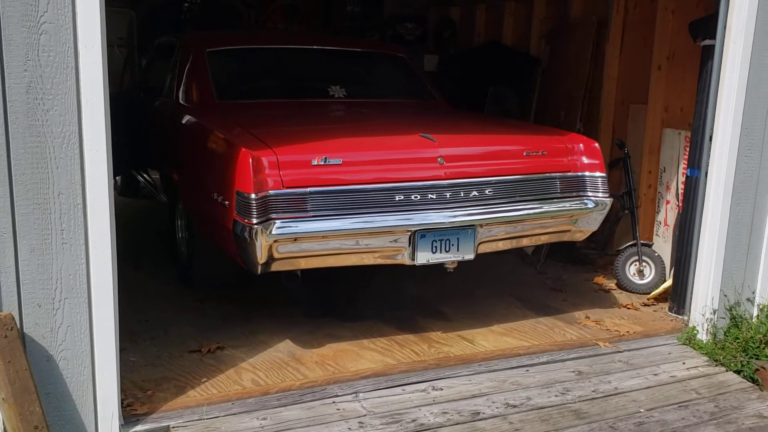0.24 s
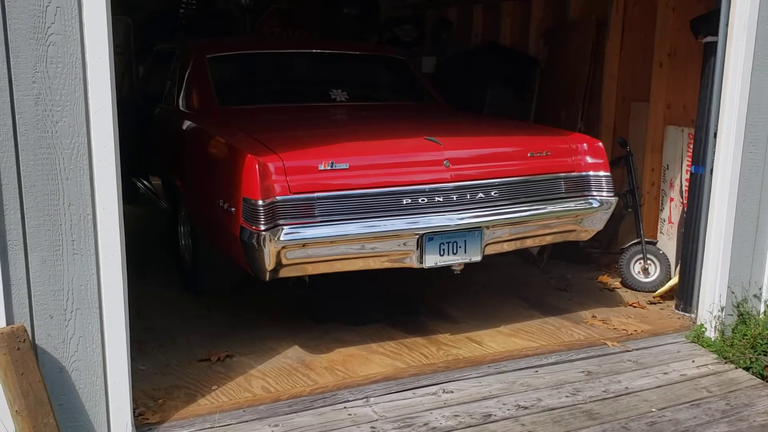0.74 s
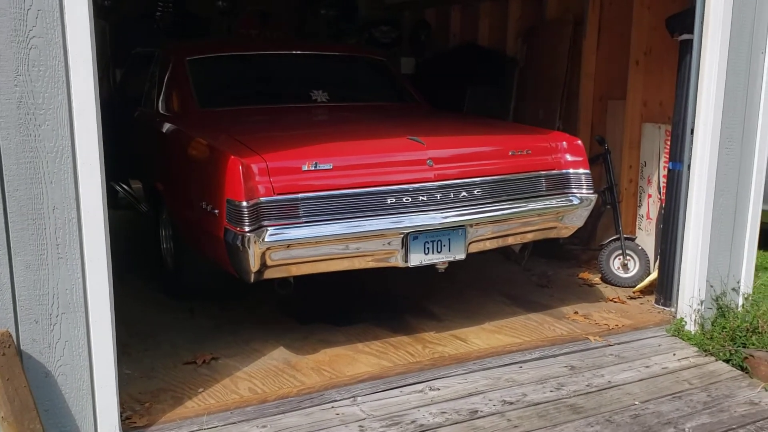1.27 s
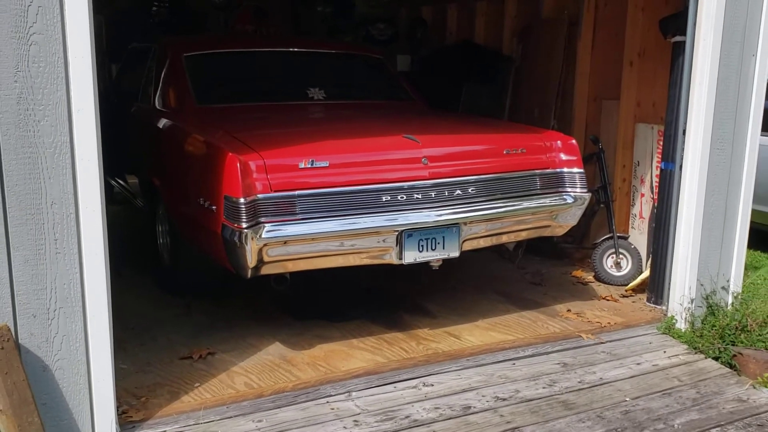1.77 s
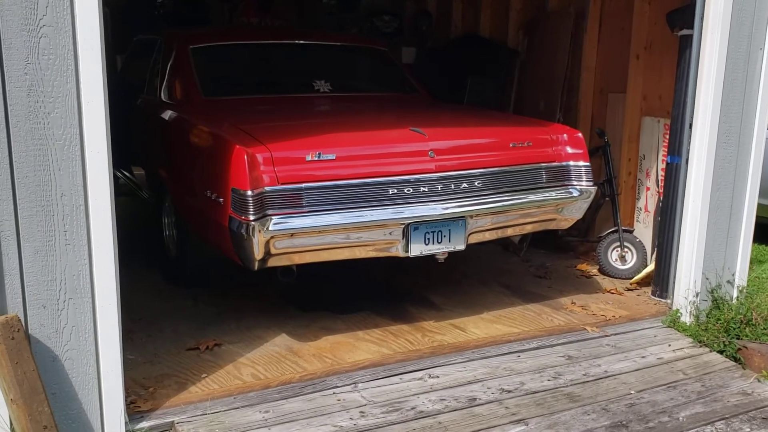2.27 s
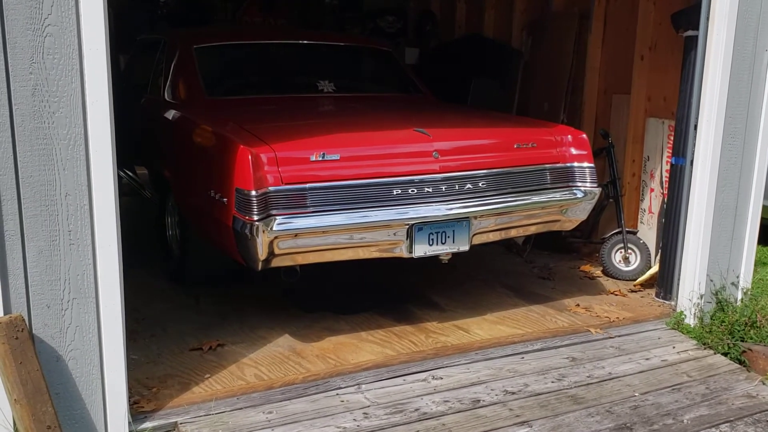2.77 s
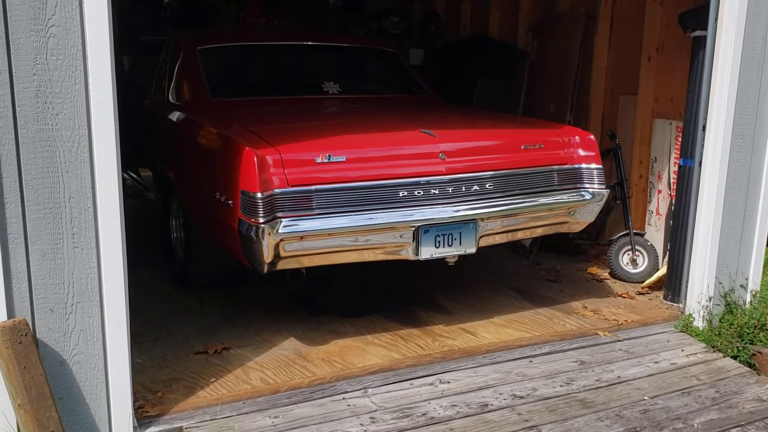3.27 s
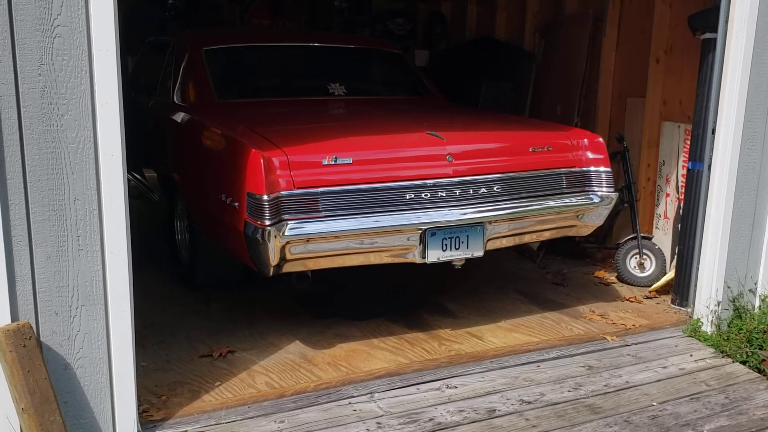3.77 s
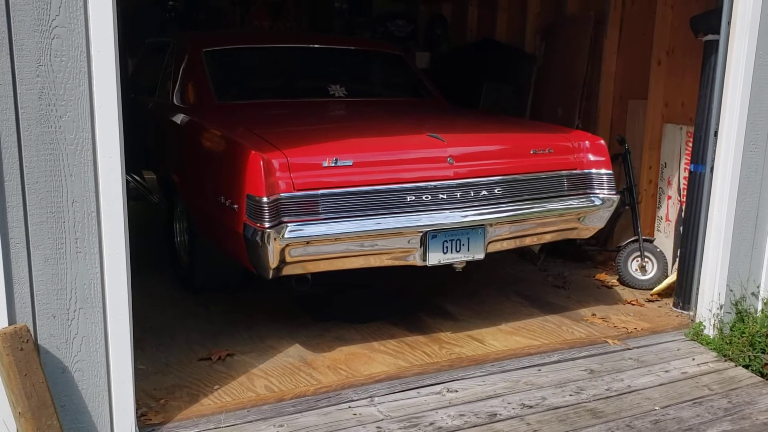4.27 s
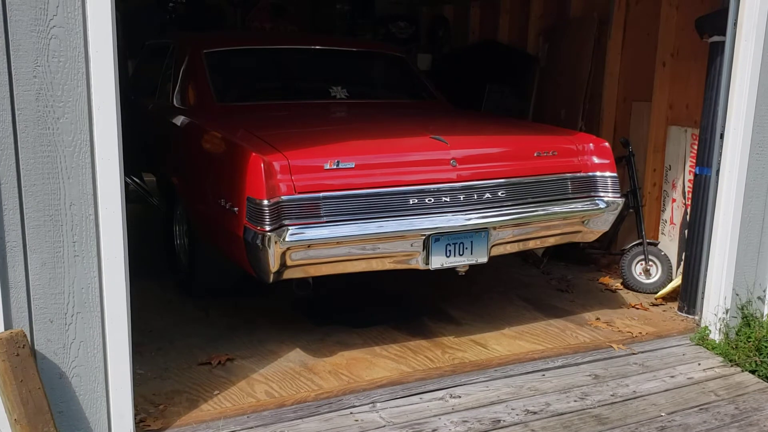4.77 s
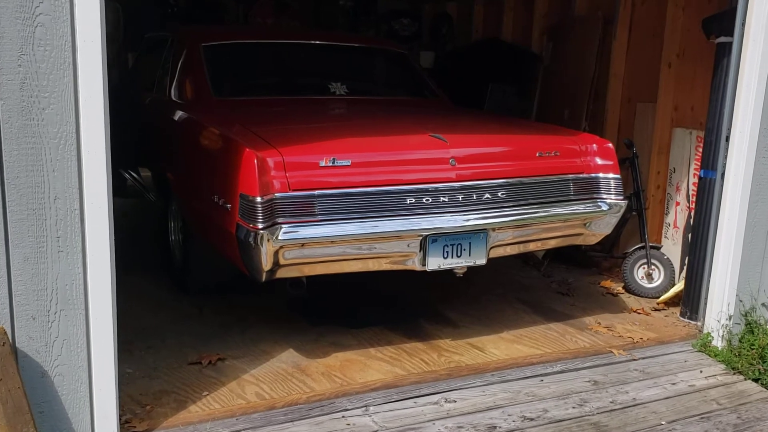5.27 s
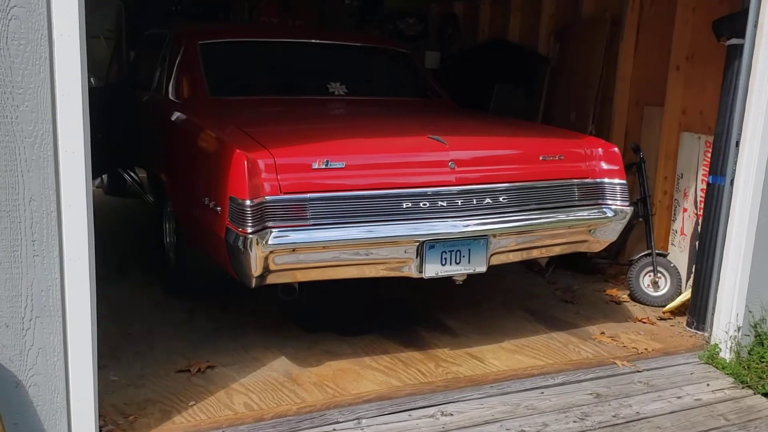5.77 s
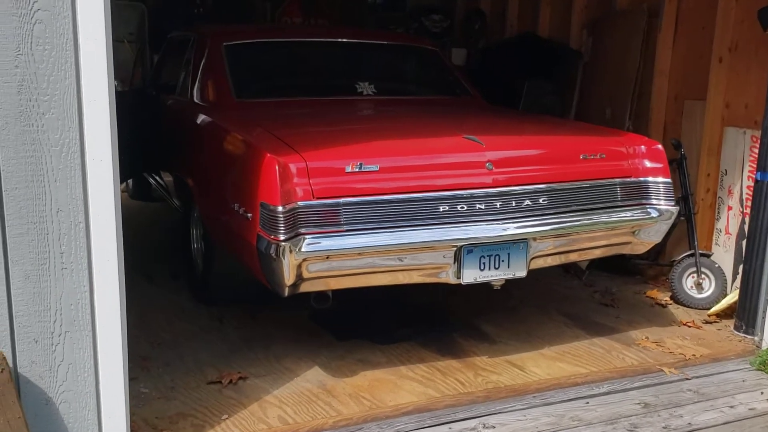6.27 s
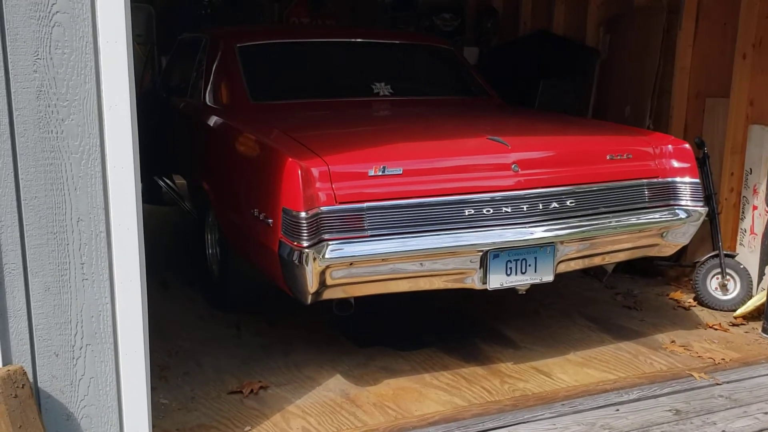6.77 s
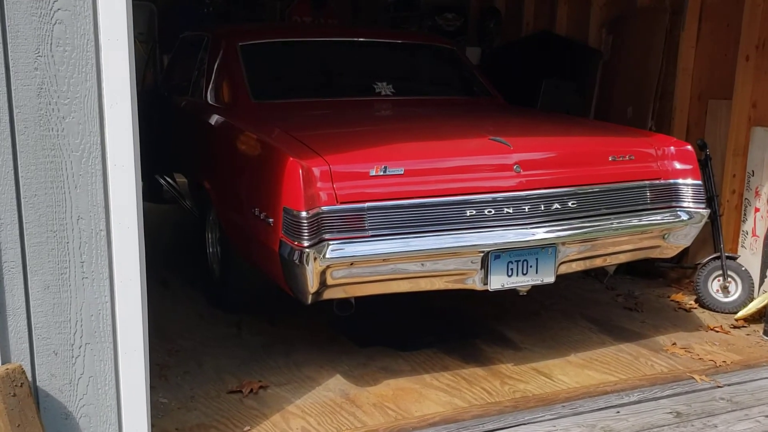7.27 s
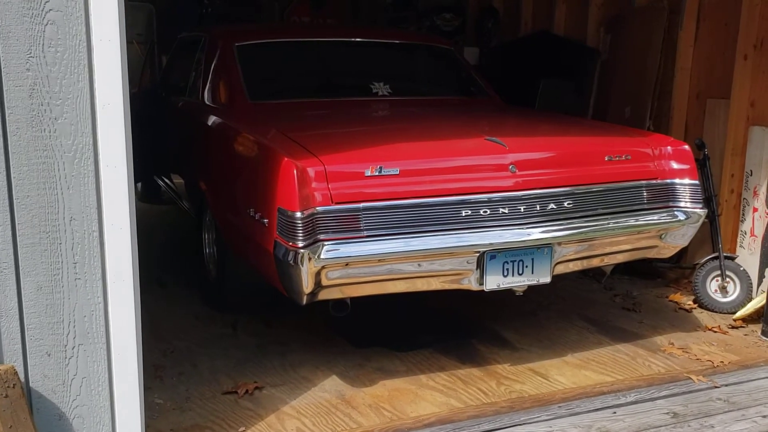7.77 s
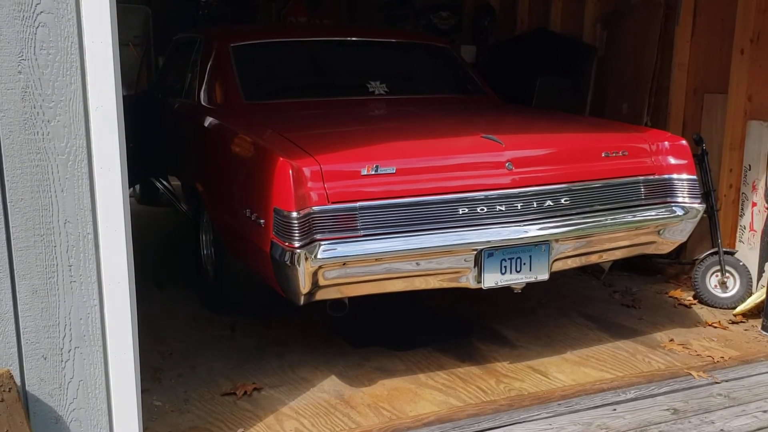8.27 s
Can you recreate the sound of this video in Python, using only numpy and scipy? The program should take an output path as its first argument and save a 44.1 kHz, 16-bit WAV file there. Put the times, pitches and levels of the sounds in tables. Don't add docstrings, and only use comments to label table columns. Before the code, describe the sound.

A large eight-cylinder engine idles inside a small wooden garage, heard close from the open door behind its twin tailpipes. It stumbles and picks up with a thin metallic rattle, a throttle blip makes it race at two seconds, then it sags, lopes and almost stalls before catching and settling into a deep hum with rhythmic exhaust chuffs. Stereo, leaning left, with short boomy wooden reflections.

```python
import sys
import numpy as np
from scipy import signal
from scipy.fft import rfft, irfft, next_fast_len
from scipy.io import wavfile
from scipy.ndimage import uniform_filter1d

SR = 44100
rng = np.random.default_rng(int(sys.argv[2]) if len(sys.argv) > 2 else 0)


def makeup_ratio(level_db):
    decades = np.asarray(level_db, float) / 20
    return 10 ** decades


def int16_out(signal):
    q = np.round(np.clip(np.atleast_2d(signal).T, -1, 1) * 32767)
    wavfile.write(sys.argv[1], SR, q.astype(np.int16))


N = 376173

# time_s, speed_cycles_per_s
ENGINE_SPEED = [(0.0, 12.399), (0.169, 12.38), (0.818, 11.053), (1.068, 11.535), (1.426, 14.023),
                (1.676, 13.357), (1.971, 17.475), (2.113, 14.799), (2.315, 13.867), (2.621, 11.376),
                (2.934, 13.166), (3.382, 12.003), (4.432, 10.099), (5.35, 11.634), (5.563, 11.947),
                (7.12, 12.996), (7.631, 11.967), (8.53, 11.038)]
# time_s, load_db
BURN_LOAD = [(0, -12.5), (.4, -8.5), (.6, -6.5), (1.0, 2.5), (1.4, -2), (1.53, -5), (1.7, -1.5),
             (1.9, -1.5), (2.0, -16), (2.15, -10.5), (2.4, -5), (2.57, -6.5), (2.7, 0), (3.2, -3.5),
             (3.8, -2.5), (4.6, -1.5), (5.1, 0), (8.53, 0.5)]


def crankshaft():
    rate, load_db = curve(ENGINE_SPEED), curve(BURN_LOAD)
    cycle = 0.157 + np.cumsum(rate) / SR
    slot = np.floor(8 * cycle - 0.2).astype(int)
    fired = np.flatnonzero(np.diff(slot)) + 1
    return rate, load_db, cycle, fired, slot[fired] % 8


# pitch_hz, level_db
FIRING_TONE = [(82, -17), (92, -15.5), (105, -15), (115, -14.5), (125, -24), (137, -21)]
# pitch_hz, level_db
BANK_TONE = [(51, -34), (56, -24.5), (60, -24), (65, -23), (72, -17), (86, -15.5)]
# pitch_hz, level_db
PAIR_TONE = [(102, -25), (112, -33), (118, -44), (126, -24), (138, -30), (160, -15), (172, -22)]
# beats_per_cycle, level_db (against the firing tone at idle)
WEAK_TONES = [(6, -43), (7, -14), (11, -48), (12, -46), (13, -33), (15, -26), (16, -19), (18, -18),
              (19, -13), (20, -22.5), (21, -18.5), (27, -38.5), (29, -34.5)]
# pitch_hz, level_db
PIPE_COLOUR = [(60, -17), (140, 3), (178, 2), (197, -19), (230, -11.5), (265, 1), (310, 4), (350, -6.5),
               (400, -20)]


def hum(cycle, rate, load_db):
    pipe_lag = 0.84
    firing_db = load_db + read(FIRING_TONE, 8 * rate)
    bank_db = load_db + read(BANK_TONE, 5 * rate)
    pair_db = load_db + read(PAIR_TONE, 10 * rate)
    weak_db = (firing_db + load_db - 16) / 2
    tones = [(8, firing_db), (5, bank_db), (10, pair_db)]
    tones += [(k, weak_db + db + read(PIPE_COLOUR, k * rate)) for k, db in WEAK_TONES]
    drag = 1.5 * np.tanh((rate - 11.9) / 1.2)
    total = np.zeros(N)
    for k, db in tones:
        angle = 2 * np.pi * k * cycle - pipe_lag - drag * (k == 5)
        total += np.sqrt(2) * makeup_ratio(db) * np.cos(angle)
    return total


# time_s, depth (0 to 1)
LOPE_DEPTH = [(0, .3), (.4, .5), (.9, .4), (1.3, .2), (2, .2), (2.3, .3), (3, .1), (3.8, .2), (4.15, .7),
              (4.6, .9), (5, .7), (5.3, .3), (6, .1), (7.5, .1), (8.1, .4), (8.53, .3)]


def lope(at):
    lead_s = 0.006
    swell = struck(at - round(lead_s * SR), 1.0, rise_s=0.03, fall_s=0.028)
    swing = swell - uniform_filter1d(swell, size=SR // 8)
    return np.maximum(1 + 1.7 * curve(LOPE_DEPTH) * swing, 0)


# time_s,
# peak_db
STRONG_BURNS = [(.1306, -29.5), (.344, -27), (.4095, -24), (.4499, -26), (.5067, -21), (.5676, -24.5),
                (.6235, -19), (.687, -22), (.746, -20), (.8, -18), (.8689, -14), (.9457, -15.5),
                (1.0006, -16), (1.046, -14), (1.1199, -16.5), (1.151, -16), (1.202, -15.5), (1.288, -15),
                (1.652, -20), (1.721, -19), (1.7689, -14.5), (1.8976, -17), (2.2054, -28), (2.3301, -34),
                (2.388, -28.5), (2.4563, -37), (2.5406, -39), (2.6314, -31), (2.7077, -23), (2.747, -20.5),
                (3.2615, -26), (3.3528, -23), (3.433, -22.5), (3.675, -18.5), (3.854, -20), (3.927, -18),
                 (4.1166, -20.5), (4.182, -16), (4.2585, -14.5), (4.322, -14.5), (4.376, -21),
                 (4.4563, -11), (4.515, -11), (4.573, -14.5), (4.6483, -11), (4.7167, -14), (4.783, -13.5),
                 (4.837, -11.5), (4.904, -13), (4.963, -13.5), (5.02, -14), (5.0853, -17.5), (5.144, -16.5),
                 (5.2679, -16.5), (5.335, -17.5), (5.463, -14), (8.113, -22.5), (8.1604, -16), (8.22, -17),
                 (8.268, -19),
                (5.5149, -18), (5.6092, -23), (5.6516, -17.5), (5.6835, -17.5), (5.8501, -18.5),
                  (5.9703, -22), (6.0212, -20), (6.8404, -22), (7.2379, -25), (7.2863, -23), (7.3562, -23),
                  (7.6106, -21), (7.6844, -24), (7.799, -19.5), (7.94, -23), (7.973, -19), (8.035, -18),
                  (8.3215, -23), (8.3873, -17), (8.501, -17.5)]
# start_s, end_s, peak_db
SETTLED_IDLE = [
    (6.05, 7.15, -18),
]


def strong_burns(cycle):
    leader_s = 6.256
    alternate_db, stray_db, spread_db = -8, -7, 1.2
    turn = np.arange(-10, 30)
    leader_turns = cycle[round(leader_s * SR)] + turn
    stray_turns = leader_turns + 0.3 + 0.4 * rng.random(len(turn))
    leader_chance = alternate_db * (turn % 2) + spread_db * rng.standard_normal(len(turn))
    stray_chance = stray_db + spread_db * rng.standard_normal(len(turn))
    times = np.interp(np.r_[leader_turns, stray_turns], cycle, np.arange(N) / SR)
    chances = np.r_[leader_chance, stray_chance]
    rows = STRONG_BURNS
    for start, end, db in SETTLED_IDLE:
        rows = rows + [(s, db + extra) for s, extra in zip(times, chances) if start <= s < end]
    s, peak_db = np.transpose(rows)
    fuller_db = -1.03 * np.minimum(peak_db + 22.5, 0)
    low_db = -10.5 + fuller_db + 3 * rng.standard_normal(len(s))
    return np.round(s * SR).astype(int), peak_db, low_db


# pitch_hz, level_db
RUMBLE_COLOUR = [(20, -40.5), (40, -26.5), (55, -1.5), (90, 0.5), (130, -6), (175, -9.5), (200, -14.5),
                 (250, -7), (310, -18), (350, -15), (420, -42), (600, -56)]
# speed_cycles_per_s, rumble_db (at idle load)
UNEVEN_BURNS = [(10, -23), (11.5, -24.5), (13, -24.5), (14.5, -22.5), (17, -18)]


def rumble(fired, rate, load_db):
    load_share, echo_s = 0.54, 0.21
    level_db = load_share * load_db + read(UNEVEN_BURNS, rate)
    thud = causal(read(RUMBLE_COLOUR, abs(np.fft.fftfreq(16384, 1 / SR))))
    luck = rng.standard_normal(len(fired))
    burns = signal.lfilter([1], np.r_[1, np.zeros(7), -0.65], luck)
    mouths = np.zeros((2, N))
    mouths[np.arange(len(fired)) % 2, fired] = np.tanh(burns / 1.3)
    t = np.arange(SR // 3) / SR
    both, left, right = rng.standard_normal((3, 2, SR // 3))
    shed = np.array([both + 0.43 * left, both + 0.24 * right]) * makeup_ratio(-60 * t / echo_s)
    shed /= np.linalg.norm(shed[0, 0])
    shed[..., 0] = 1
    boom = signal.oaconvolve(mouths[None], shed, axes=2)[..., :N].sum(axis=1)
    return makeup_ratio(level_db + 1.5) * evened(signal.oaconvolve(boom, thud[None])[:, :N])


# time_s, flow_db
THROTTLE_FLOW = [(0, -46), (.73, -42), (.87, -34.5), (1.29, -28.5), (1.43, -29.5), (1.56, -42), (1.71, -28),
                 (1.9, -24), (2.0, -39.5), (2.27, -46), (2.64, -43.5), (2.7, -32.5), (2.83, -30),
                 (3.2, -38.5), (4.4, -36.5), (5.0, -34), (5.5, -31.5), (8.53, -36.5)]
CYLINDER_PUFFS = [2, -13, 2, 6, -38.5, 2.5, -1.5, 4]
# pitch_hz, level_db (per Hz)
HISS_COLOUR = [(1000, -12), (1800, -8.5), (2430, -2.5), (3770, 0), (4570, 2.5), (7030, 1), (8670, -4),
               (10500, -1), (12100, 0), (13900, -4), (15000, -2.5), (15850, -2), (16000, -40), (16400, -70)]
# pitch_hz, level_db (per Hz)
BODY_COLOUR = [(250, -9), (340, -7.5), (420, -6), (520, -3.5), (750, -3), (830, -7.5), (1100, -9.5),
               (1600, -5), (2000, -11), (3000, -9.5), (5000, -21.5)]


def gas(fired, cylinder, at, peak_db, low_db):
    rush = makeup_ratio(2 * curve(THROTTLE_FLOW))
    luck_db = 6.1 * np.tanh(0.5 * rng.standard_normal(len(fired)))
    strength_db = np.take(CYLINDER_PUFFS, cylinder) + luck_db
    puffs = struck(fired, makeup_ratio(2 * strength_db), rise_s=0.00029, fall_s=0.0047)
    bright_chuffs = struck(at, makeup_ratio(2 * (peak_db - 13.5)), rise_s=0.00028, fall_s=0.032)
    dull_chuffs = struck(at, makeup_ratio(2 * (peak_db + low_db - 8.0)), rise_s=0.0014, fall_s=0.027)
    bright = rush * (0.55 + 0.51 * puffs) + bright_chuffs * (1.6 + 0.41 * puffs)
    dull = rush ** 0.8 * makeup_ratio(-13.5) * (0.68 + 0.17 * puffs) + dull_chuffs
    hiss = np.sqrt(bright) * noise(HISS_COLOUR, patchy_db=2) * makeup_ratio(0.57)
    return hiss + np.sqrt(dull) * noise(BODY_COLOUR, patchy_db=1.5)


# pitch_hz, width_hz, level_db
RING_PITCHES = [(346, 16, 7), (481, 30, 6), (566, 20, 8), (632, 30, 7), (710, 20, 8), (940, 45, 11),
                (1186, 55, 4), (1345, 55, 5), (1508, 27, 8), (1650, 22, 5), (1744, 27, 5), (2094, 38, 5),
                (2520, 90, 4), (4750, 100, 4)]


def ringing(x):
    hz = abs(np.fft.fftfreq(16384, 1 / SR))
    rings = causal(sum(db / (1 + (2 * (hz - f) / width) ** 2) for f, width, db in RING_PITCHES))
    return signal.oaconvolve(x, rings[None])[:, :N]


# time_s, peak_db
SHIELD_BUZZES = [
    (0.9542, -18),
    (1.0091, -29),
    (1.2032, -31),
    (1.4351, -17),
    (2.7087, -18.5),
    (2.7906, -19),
    (2.876, -15.5),
]


def buzz():
    s, peak_db = np.transpose(SHIELD_BUZZES)
    band = signal.butter(2, [4500, 5000], "band", fs=SR, output="sos")
    rattle = evened(signal.sosfilt(band, rng.standard_normal((2, N))))
    return rattle * struck(np.round(s * SR).astype(int), makeup_ratio(peak_db - 13.0), rise_s=0.0012, fall_s=0.035)


# pitch_hz, likeness (1 is the same)
LEFT_RIGHT_LIKENESS = [(60, 1.0), (110, 1.0), (200, 0.98), (380, 0.95), (700, 0.89), (1290, 0.61),
                       (2380, 0.29), (4400, -0.01), (8120, -0.01), (15000, -0.02)]


def noise(spectrum, patchy_db):
    frames, hz = N // 256 + 5, np.fft.rfftfreq(1024, 1 / SR)
    a, b, c, d, patches = rng.standard_normal((frames, 513, 5)).T
    patches = uniform_filter1d(patches, size=14, axis=0)
    patches = evened(uniform_filter1d(patches, size=5, axis=1))
    same = np.clip(read(LEFT_RIGHT_LIKENESS, hz), 0, 1)[:, None]
    left = a + 1j * b
    right = same * left + np.sqrt(1 - same ** 2) * (c + 1j * d)
    z = np.array([left, right]) * makeup_ratio(read(spectrum, hz)[:, None] + patchy_db * patches)
    return evened(signal.istft(z, nperseg=1024, noverlap=768)[1][:, :N])


def struck(at, size, rise_s, fall_s):
    t, train = np.arange(SR // 4) / SR, np.zeros(N)
    np.add.at(train, at, size)
    shape = (1 - np.exp(-t / rise_s)) * np.exp(-(t / fall_s) ** 2)
    return np.maximum(signal.oaconvolve(train, shape / shape.max())[:N], 0)


def causal(gain_db):
    log_gain = np.log(makeup_ratio(gain_db))
    return np.fft.ifft(np.exp(np.conj(signal.hilbert(log_gain)))).real[:8192]


def evened(x):
    return x / np.sqrt(np.mean(x ** 2) + 1e-20)


def read(points, hz):
    f, value = np.transpose(points)
    return np.interp(np.log(hz + 1), np.log(f + 1), value)


def curve(rows):
    s, value = np.transpose(rows)
    return np.interp(np.arange(N) / SR, s, value)


def scene():
    rate, load_db, cycle, fired, cylinder = crankshaft()
    at, peak_db, low_db = strong_burns(cycle)
    loping_hum = hum(cycle, rate, load_db) * lope(at)
    exhaust = ringing(gas(fired, cylinder, at, peak_db, low_db))
    return loping_hum + rumble(fired, rate, load_db) + exhaust + buzz()


def roll_off(x):
    return signal.sosfilt(signal.butter(12, 16810, fs=SR, output="sos"), x)


# pitch_hz, left_minus_right_db
LEFT_LEAN = [(60, 2.5), (180, 2.5), (550, 2.5), (1650, 2.0), (4970, 4.5), (15000, 4.5)]


def record(dry):
    size = next_fast_len(N)
    hz = np.fft.rfftfreq(size, 1 / SR)
    half_db = read(LEFT_LEAN, hz) / 2
    x = irfft(rfft(dry, size) * makeup_ratio([half_db, -half_db]), size)
    x = x / (1 + abs(x / 0.95) ** 6) ** (1 / 6)
    x = irfft(rfft(x) * (hz < 16000), size)[:, :N]
    return roll_off(x)


dry = scene()
out = record(dry)
int16_out(out)
```